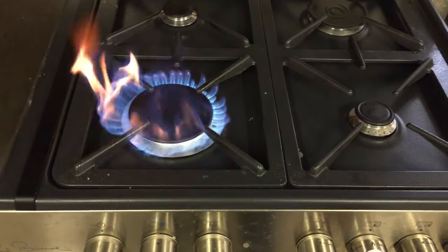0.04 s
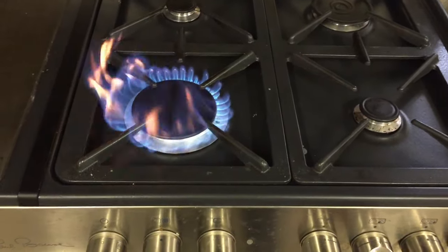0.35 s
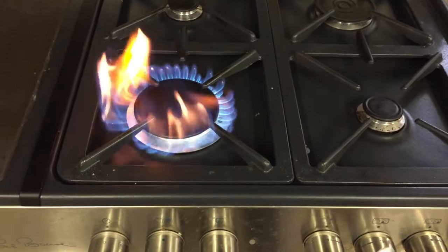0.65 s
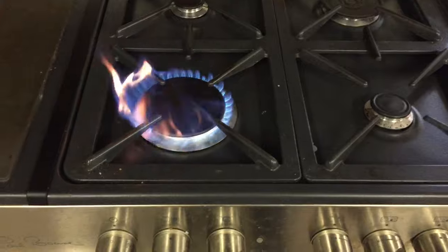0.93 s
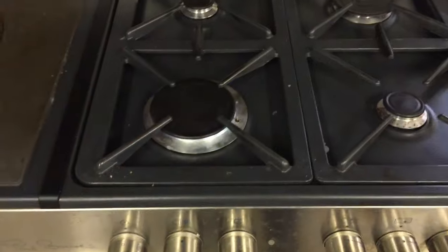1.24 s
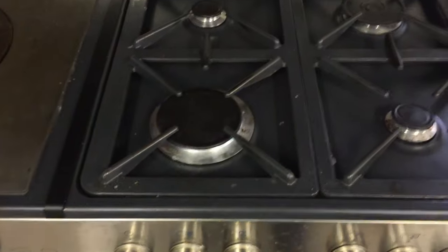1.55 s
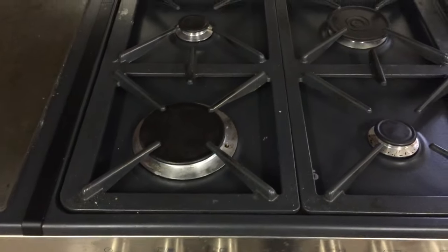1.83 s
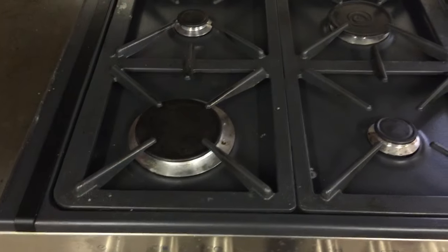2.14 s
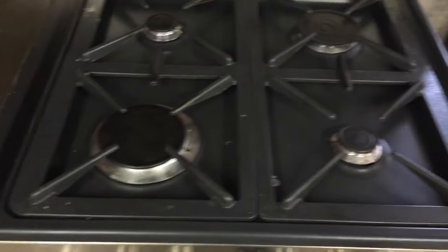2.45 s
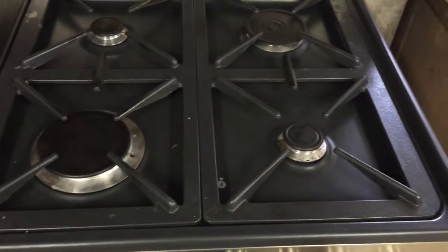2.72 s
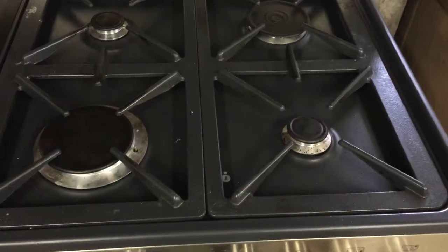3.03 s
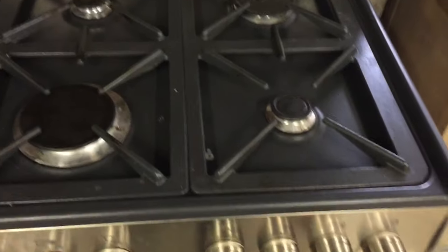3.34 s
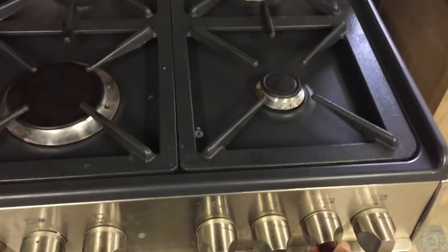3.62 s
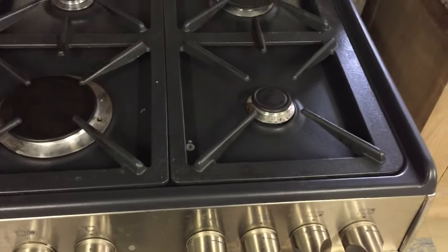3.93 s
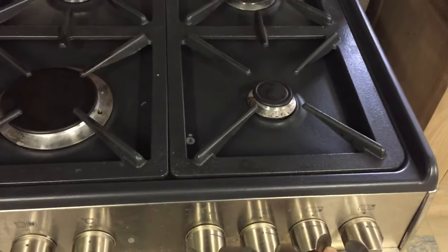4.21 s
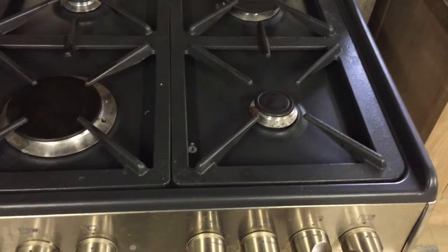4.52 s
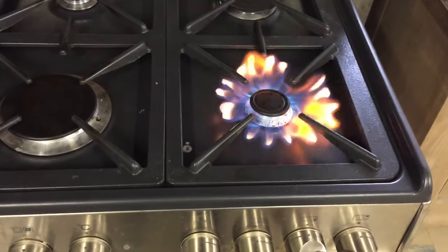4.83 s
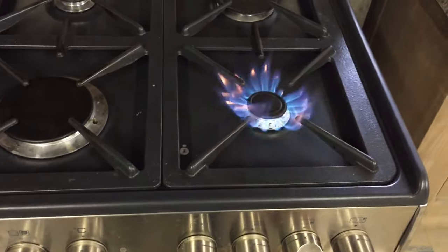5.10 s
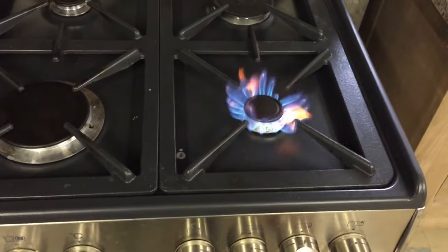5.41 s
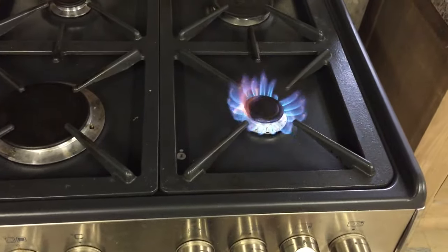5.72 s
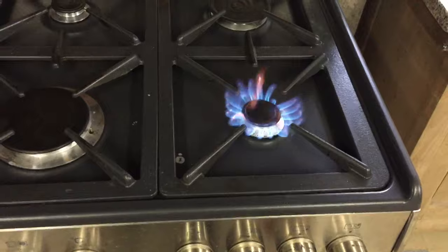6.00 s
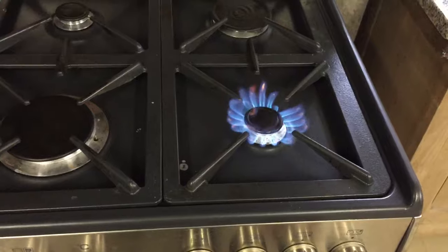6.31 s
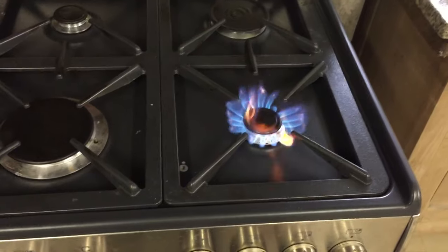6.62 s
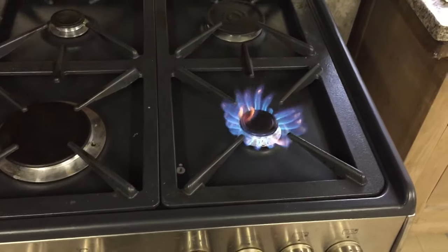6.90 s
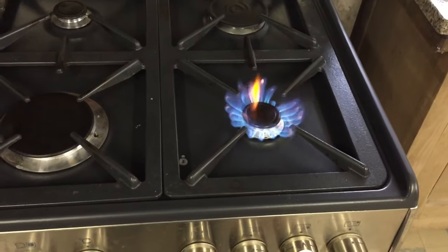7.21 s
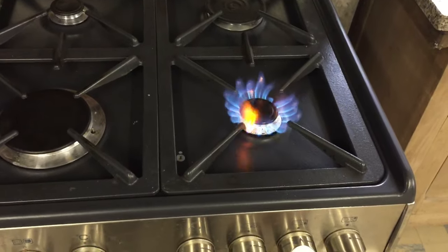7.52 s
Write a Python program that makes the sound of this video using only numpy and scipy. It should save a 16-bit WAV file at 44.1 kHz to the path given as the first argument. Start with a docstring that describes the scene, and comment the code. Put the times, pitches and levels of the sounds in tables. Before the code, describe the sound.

A gas hob is heard up close in a small kitchen, over a faint, steady motor hum and a very faint, thin whistle that slowly fades. A large burner hisses and flutters softly. At 0.9 seconds one sharp spark snaps, and the burner dies away just after. A knob knocks softly at 1.3 seconds, then a hand brushes and dully bumps the hob around 1.7. Light knocks and a click sound on the steel panel near 3 seconds, with another small knock and bump around 4. At 4.8 seconds the igniter gives four bright snaps, about 0.3 seconds apart, the first lighting a small burner with a low whump and a faint hiss. The knob springs back with a metallic click at 5.9 seconds, followed by a knock. The flame flutters quietly until the end, around 7.5 seconds. Sparks, knocks and whump echo briefly.

```python
"""A small kitchen, phone microphone close to a gas hob, a motor humming steadily behind it.
Gas hisses through the big burner's mixing tube; one stray spark snaps and the burner is shut off.
A hand brushes and bumps the hob, and knobs knock softly on its steel front panel.
Four sparks snap at the small burner, the first lighting the pooled gas with a whump; the knob springs
back and the flame flutters on. A faint whistle fades throughout; sparks, knocks and whump echo briefly."""
import sys
import numpy as np
from scipy import signal
from scipy.fft import rfft, irfft, next_fast_len
from scipy.io import wavfile

SR = 44100
rng = np.random.default_rng(int(sys.argv[2]) if len(sys.argv) > 2 else 0)


def wav_record(signal):
    """Record a signal, one row per channel, as 16-bit PCM in the file named by sys.argv[1]."""
    frames = np.transpose(np.atleast_2d(signal))
    bounded = np.clip(frames, -1, 1)
    # unit amplitude maps onto the largest positive 16-bit level
    quanta = np.round(bounded * 32767).astype(np.int16)
    wavfile.write(sys.argv[1], SR, quanta)


N = 341775
T = np.arange(N) / SR

# Table levels are relative, ahead of each layer's gain, unless marked rms.
# igniter discharges; a short arc sounds thinner
# (time [s], near arc [dB], far arcs [dB], low cut [Hz], burner cap ring [dB])
SPARKS = [(0.8889, -1, 4.8, 2600, 1), (4.829, 2.8, 6.3, 750, 0), (5.1272, 1.5, 3.5, 1200, -15.5),
          (5.4101, 2, .5, 1300, -15), (5.7074, 5, -4.5, 1297, -14)]
# cavities of burner crown and pan that an arc rings (frequency [Hz], width [Hz], level [dB])
CROWN_MODES = [(998, 230, -16), (1730, 130, -16.5), (2727, 120, -7), (3700, 300, -8), (4640, 550, 0),
               (5450, 750, -2.5), (6850, 590, 4.5), (8250, 320, 3.5), (9151, 620, -1.5), (11040, 503, -9),
               (11600, 550, -3), (13520, 1500, -6), (15580, 1500, -1.5)]
# the crack as the whole hob radiates it into the room (frequency [Hz], level [dB])
CRACK_SPECTRUM = [(100, -28.5), (500, -18.5), (1000, -18), (1600, -13.5), (2700, -9), (4000, -5),
                  (5800, -0.5), (7600, -3), (9000, -5), (10500, -10), (13000, -10.5), (15500, -6.5)]
# pooled gas flaring up (time [s], level [dB], high cut [Hz])
FLARES = [(4.83, -28, 520.7), (4.955, -45.5, 900.3)]
# hollow under the hob top (frequency [Hz], width [Hz], level [dB])
HOLLOW_MODES = [(139.55, 37, 6), (300, 130, -2), (636, 160, 4), (1108.5, 610, -5.5)]
# big burner's mixing tube (frequency [Hz], width [Hz], level [dB])
BIG_TUBE_MODES = [(982.5, 38, 6), (1713, 87, 0), (2660, 78, -10.5), (3773.1, 80, -11.5), (4750, 130, -21),
                  (5440, 300, -19.5), (6400, 510, -20.5), (8200, 220, -16)]
# small burner's mixing tube (frequency [Hz], width [Hz], level [dB])
SMALL_TUBE_MODES = [(678.4, 12, 5.5), (1082, 40, -6), (1790, 90, -2), (2930, 480, -9), (4700, 300, -21),
                    (6220, 150, -11)]
# low flutter of the flames (frequency [Hz], level [dB])
FLAME_SPECTRUM = [(30, -22), (70, 3), (110, -7), (152, 1.5), (220, -8.5), (400, -18), (900, -38),
                  (4000, -49)]
# knobs knocking on the panel, a tap and then a thud (time [s], tap [dB], thud [dB], tap t60 [s])
KNOCKS = [(1.294, -35.5, -26, .08), (2.732, -38, -44, .04), (2.9005, -23.5, -24, .014),
          (3.06, -36, -37, .08), (3.9245, -30, -43, .016), (6.003, -19, -15, .095),
          (6.865, -41.5, -44, 0.051)]
# a palm bumping the hob, soft and dull (time [s], level [dB])
PALM_BUMPS = [(1.652, -28), (1.768, -24.5), (4.11, -33)]
# valve spindles clicking against their stops (time [s], tick [dB], spring [dB])
VALVE_SNAPS = [(2.8965, -18.5, -44), (2.8998, -20, -16), (5.9132, -11.5, .5)]
# sheet-steel front panel (frequency [Hz], width [Hz], level [dB])
PANEL_MODES = [(200, 46.3, 5), (309, 139, 4.5), (558.4, 269, 1), (771, 135, -3), (988, 337, -3.5),
               (1420, 280, -11.5), (2000, 485, -0.5), (3370, 1180, -9)]
# valve spindle and spring (frequency [Hz], width [Hz], level [dB])
SPINDLE_MODES = [(2845, 220, -7), (3520, 220, 1), (5240, 220, 0), (6160, 620, -8), (8360, 960, -13),
                 (9260, 380, -12.5), (12580, 1320, -10)]
# resonances rung by the brushing hand (frequency [Hz], width [Hz], level [dB])
BRUSH_MODES = [(1278, 99, -0.5), (1556, 140, -1), (1810, 110, -1.5), (2250, 205, -6), (2670, 210, -9.5)]
# motor hum on multiples of the shaft speed (frequency [Hz], rms level [dB])
HUM_LINES = [(48.4, -50.5), (145.3, -70), (193.8, -86), (242.2, -62), (290.7, -79.5), (339.1, -79.5),
             (387.6, -80.5), (436.0, -78), (678.3, -84)]
# faint motor whine (frequency [Hz], rms level [dB])
WHINE_LINES = [(1550, -90.5), (2132, -88), (5281, -91)]
# room tone of the kitchen air (frequency [Hz], level [dB])
AIR_SPECTRUM = [(25, -10.5), (60, 2.5), (85, 11), (110, -7), (150, 1.5), (200, -2), (280, -2), (400, -10.5),
                (800, -13.5), (1500, -14.5), (2600, -16.5), (4500, -20.5), (9000, -26), (16000, -29)]
# kitchen echo (frequency [Hz], t60 [s], level [dB])
ECHO_BANDS = [(100, .4, -6.5), (500, 0.5, -0.5), (1500, 0.54, 0), (3000, 0.5474, -2.5), (5740, .55, -5),
              (9470, 0.41, -0.5), (11960, .38, -2.5), (16000, .33, -6)]

BIG_SHUT_S, BIG_SHUT_T60_S = 1, .316  # the big burner's valve closes
LIGHTS_S, FRONT_RUN_S = FLARES[0][0], .06  # the small burner catches; a flame front rounds its crown


def igniter(direct_db=8, bare_db=-15, far_lag_s=.00116, bounce_s=.00027, bounce_db=-7,
            cap_hz=3606, cap_width_hz=220, scatter_db=2, scatter_t60=.013, room_db=3):
    """All electrodes fire together; the far arcs reach the microphone a moment after the near one."""
    arcs, sparks, caps = np.zeros((3, N))
    t = T[:SR // 40]
    for s, near_db, far_db, corner_hz, cap_db in SPARKS:
        arc = highpass(signal.unit_impulse(len(t)), corner_hz)
        add(sparks, s, np.hypot(undb(near_db), undb(far_db)) * arc)
        for at, db in ((s, near_db), (s + far_lag_s, far_db)):
            add(arcs, at, undb(db) * arc)
            add(caps, at, undb(db + cap_db) * arc)
            # the bounce off the steel top; each arc takes its own path
            add(arcs, at + bounce_s * np.exp(.25 * rng.standard_normal()), -undb(db + bounce_db) * arc)
    cap_ring = ring(caps, [(cap_hz, cap_width_hz, 0)])
    direct = undb(bare_db) * highpass(arcs, 3000) - ring(arcs, CROWN_MODES) + cap_ring
    cracks = colour(sparks, CRACK_SPECTRUM)
    # the pan supports scatter the crack
    supports = rng.standard_normal(len(t)) * fade(t, scatter_t60)
    scattered = signal.oaconvolve(cracks, supports / np.linalg.norm(supports))[:N]
    echo = kitchen_echo(cracks, early_db=3, early_t60=.079)
    return undb(direct_db) * direct + undb(scatter_db) * scattered + undb(room_db) * echo


def ignition(pop_db=-8, pop_hz=220, pop_t60=.035, swell_db=16.5, front_t60=.04,
             roar_db=-17, roar_t60=.4, room_db=-7):
    """Pooled gas pops; each flame front swells, booms in the hob's hollow and sinks to a low roar."""
    push = bursts([(LIGHTS_S, pop_db, pop_hz, pop_t60)], order=2)
    for s, db, hz in FLARES:
        swell = (T > s) * undb(swell_db * (rise(s, FRONT_RUN_S) - 1))
        peak_s = s + FRONT_RUN_S
        collapse = release(peak_s, front_t60) + undb(roar_db) * release(peak_s, roar_t60)
        push += undb(db) * swell * collapse * unit(lowpass(rng.standard_normal(N), hz))
    boom = ring(push, HOLLOW_MODES)
    return boom + undb(room_db) * kitchen_echo(boom, early_db=4.5, early_t60=.08908)


def gas_jets(big_db=-64, big_jet_db=-22, gust_db=3.5, small_db=-72.5, small_jet_db=-26,
             small_open_s=4.7, surge_db=10, settle_s=.548):
    """Gas hisses through the mixing tubes; the small jet is loudest as it catches, then settles."""
    big_jet, small_jet = rng.standard_normal((2, N))
    # each resonance of the big tube wavers by itself
    big_tube = sum(ring(big_jet, [mode]) * undb(gust_db * walk(18)) for mode in BIG_TUBE_MODES)
    big_hiss = unit(big_tube + undb(big_jet_db) * big_jet)
    small_hiss = unit(ring(small_jet, SMALL_TUBE_MODES) + undb(small_jet_db) * small_jet)
    big_flow = release(BIG_SHUT_S, BIG_SHUT_T60_S)
    burning_s = np.maximum(T - LIGHTS_S, 0)
    small_flow = rise(small_open_s, length_s=.18) * undb(surge_db * np.exp(-burning_s / settle_s))
    return undb(big_db) * big_hiss * big_flow + undb(small_db) * small_hiss * small_flow


def flames(big_db=-61, small_db=-56, calming_db_per_s=1.31, flutter_db=3.5):
    """Flames flutter in low, irregular puffs; the big one goes out, the small starts high and calms."""
    big_flame = undb(big_db) * release(BIG_SHUT_S, BIG_SHUT_T60_S)
    burning_s = np.maximum(T - LIGHTS_S, 0)
    small_flame = rise(LIGHTS_S, FRONT_RUN_S) * undb(small_db - calming_db_per_s * burning_s)
    return noise(FLAME_SPECTRUM) * (big_flame + small_flame) * undb(flutter_db * walk(14))


def knobs_and_palm(panel_db=4, bare_db=-5, thud_lag_s=.013, thud_hz=383, bump_hz=190, bump_t60=.04,
                   jolt_db=-15, jolt_hz=1000, jolt_t60=.25, tick_db=-4, tick_t60=.0096,
                   spring_db=7, spring_t60=.019, room_db=-2):
    """Knobs and a palm ring the panel; a spindle ticks home, jolts it, and its spring chatters."""
    # a shorter tap is brighter; its thud lasts three times as long
    taps = bursts([(s, db, 1750 * (.05 / t60) ** .2, t60) for s, db, _, t60 in KNOCKS], order=2)
    thuds = bursts([(s + thud_lag_s, db, thud_hz, 3 * t60) for s, _, db, t60 in KNOCKS], order=2)
    bumps = bursts([(s, db, bump_hz, bump_t60) for s, db in PALM_BUMPS], order=2)
    jolts = bursts([(s, db + jolt_db, jolt_hz, jolt_t60) for s, db, _ in VALVE_SNAPS], order=2)
    pushes = taps + thuds + bumps + jolts
    panel = ring(pushes, PANEL_MODES) + undb(bare_db) * highpass(pushes, 235)
    ticks = bursts([(s, db, 16000, tick_t60) for s, db, _ in VALVE_SNAPS], order=1)
    chatter = bursts([(s, db, 15000, spring_t60) for s, _, db in VALVE_SNAPS], order=1)
    spring = ring(chatter, SPINDLE_MODES)
    direct = undb(panel_db) * panel + undb(tick_db) * ticks + undb(spring_db) * spring
    # the knobs sit below the edge of the hob, so their echo is duller
    echo = kitchen_echo(lowpass(direct, 7000, order=1), early_db=8.5, early_t60=.0462)
    return direct + undb(room_db) * echo


def hand_brush(start_s=1.6253, rise_s=.1395, t60=.776, level_db=-60.5, catch_db=1.5, top_hz=2900):
    """Skin slides over the panel, catching unevenly; the rub swells and dies."""
    friction = lowpass(rng.standard_normal(N), top_hz, order=4) * undb(catch_db * walk(90))
    stroke = np.sqrt(rise(start_s, rise_s)) * release(start_s + rise_s, t60)
    return undb(level_db) * unit(ring(friction, BRUSH_MODES)) * stroke


def whistle(hz=2666, wander_hz=9, start_db=-77.5, fall_db_per_s=3, swell_db=2, flicker_db=3):
    """A faint, thin tone flickers and slowly dies away."""
    cycles = np.cumsum(hz + wander_hz * walk(40)) / SR
    db = start_db - fall_db_per_s * T + swell_db * walk(3) + flicker_db * walk(20)
    return np.sqrt(2) * np.sin(2 * np.pi * cycles) * undb(db)


def motor(hum_waver_db=1, whine_waver_db=3.5, drift_s=.0004):
    """Behind the hob a motor hums on multiples of its shaft speed, with a faint wavering whine."""
    clock = T + drift_s * walk(.984)
    out = np.zeros(N)
    for lines, depth_db in ((HUM_LINES, hum_waver_db), (WHINE_LINES, whine_waver_db)):
        for hz, db in lines:
            waver = depth_db * min(hz / 250, 1) * walk(2.2)  # the shaft line is the steadiest
            out += np.sqrt(2) * undb(db + waver) * np.sin(2 * np.pi * (hz * clock + rng.random()))
    return out


def room_tone(level_db=-64, waver_db=.5):
    """Soft kitchen air around the microphone, barely wavering."""
    return noise(AIR_SPECTRUM) * undb(level_db + waver_db * walk(4))


def kitchen_echo(x, early_db, early_t60, gap_s=.0035):
    """The echo alone: worktop and cupboards answer first, then the room rings, shorter at the top."""
    t = T[:SR]
    hz, t60, db = np.transpose(ECHO_BANDS)
    log_f = np.log(np.maximum(np.fft.rfftfreq(SR, 1 / SR), 1))
    white = rfft(rng.standard_normal(SR))
    echo = np.zeros(SR)
    for share, decay, gain in zip(np.eye(len(hz)), t60, undb(db)):
        band = irfft(white * np.interp(log_f, np.log(hz), share), SR)
        echo += gain * band * (fade(t, decay) + undb(early_db) * fade(t, early_t60))
    echo *= np.clip(t / gap_s - .5, 0, 1)
    return signal.fftconvolve(x, echo / np.linalg.norm(echo))[:N]


def bursts(rows, order):
    """Dying rushes of noise, unit energy at 0 dB: (time [s], level [dB], high cut [Hz], t60 [s])."""
    out, t = np.zeros(N), T[:SR // 4]
    for s, db, hz, t60 in rows:
        push = lowpass(rng.standard_normal(len(t)) * fade(t, t60), hz, order=order)
        add(out, s, undb(db) * push / np.linalg.norm(push))
    return out


def ring(x, modes):
    """Drive a set of resonances; neighbours swing in opposite senses."""
    return sum((-1) ** k * undb(db) * signal.lfilter(*signal.iirpeak(hz, hz / width, fs=SR), x)
               for k, (hz, width, db) in enumerate(modes))


def spectrum_gains(points, size):
    """Gain for each FFT bin from (frequency [Hz], level [dB]) points."""
    hz, db = np.transpose(points)
    f = np.maximum(np.fft.rfftfreq(size, 1 / SR), 1)
    return undb(np.interp(np.log(f), np.log(hz), db))


def colour(x, points, size=1024):
    """Give a click a spectrum, causally: the phase follows from the folded cepstrum."""
    cepstrum = irfft(np.log(spectrum_gains(points, size)))
    cepstrum[1:size // 2] *= 2
    cepstrum[size // 2 + 1:] = 0
    return signal.oaconvolve(x, irfft(np.exp(rfft(cepstrum))))[:N]


def noise(points):
    """Noise of rms 1 with the given spectrum."""
    size = next_fast_len(N)
    white = rfft(rng.standard_normal(size))
    return unit(irfft(white * spectrum_gains(points, size), size)[:N])


def walk(rate):
    """Random drift with spread 1: rate levels a second, joined by straight lines."""
    levels = rng.standard_normal(1024)
    return unit(np.interp(T * rate, np.arange(len(levels)), levels))


def lowpass(x, hz, order=2):
    """Butterworth high cut."""
    return signal.sosfilt(signal.butter(order, min(hz, SR / 2 - 1), fs=SR, output="sos"), x)


def highpass(x, hz):
    """Gentle first-order low cut."""
    return x - lowpass(x, hz, order=1)


def rise(s, length_s):
    """Gain that climbs from 0 to 1, starting at s seconds."""
    return np.clip((T - s) / length_s, 0, 1)


def release(s, t60):
    """Gain that holds at 1 and dies away from s seconds on."""
    return fade(np.maximum(T - s, 0), t60)


def fade(t, t60):
    """Exponential decay, 60 dB down at t60."""
    return np.exp(-np.log(1000) * t / t60)


def add(track, s, x):
    """Mix a short sound into a track at s seconds."""
    i = int(round(s * SR))
    track[i:i + len(x)] += x[:N - i]


def undb(db):
    """Decibels to gain."""
    return np.exp(np.asarray(db) * np.log(10) / 20)


def unit(x):
    """Scale to rms 1."""
    return x / np.std(x)


def scene():
    """The hob faces the microphone at close range; both channels hear the same."""
    hob = igniter() + knobs_and_palm() + hand_brush() + ignition() + gas_jets() + flames()
    return np.tile(hob + whistle() + motor() + room_tone(), (2, 1))


def record(dry):
    """The phone rounds the loudest peaks and cuts the top above 15.9 kHz."""
    high_cut = signal.ellip(10, .2, 70, 15900, fs=SR, output="sos")
    return signal.sosfilt(high_cut, np.tanh(dry))


dry = scene()
out = record(dry)
wav_record(out)
```